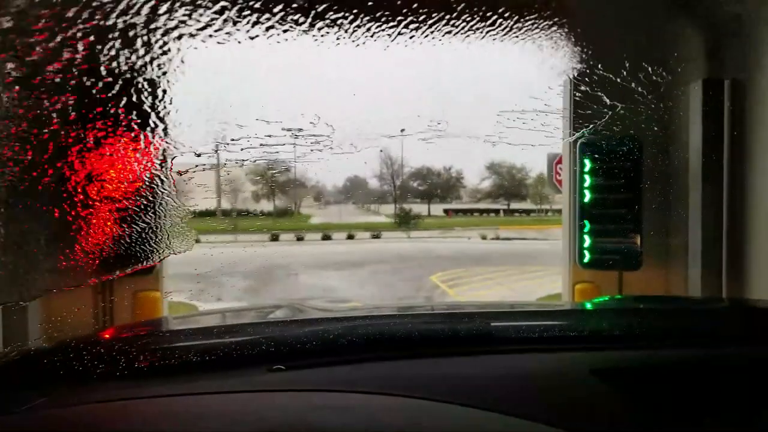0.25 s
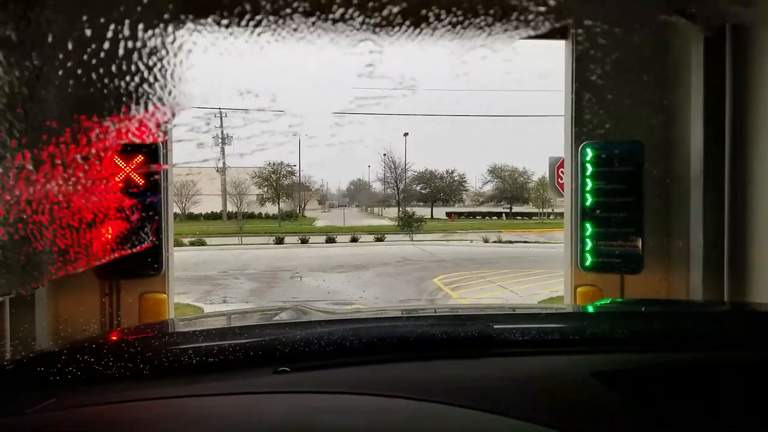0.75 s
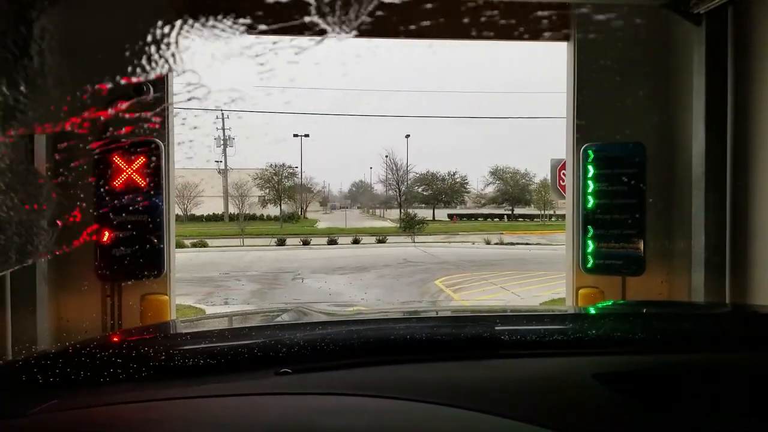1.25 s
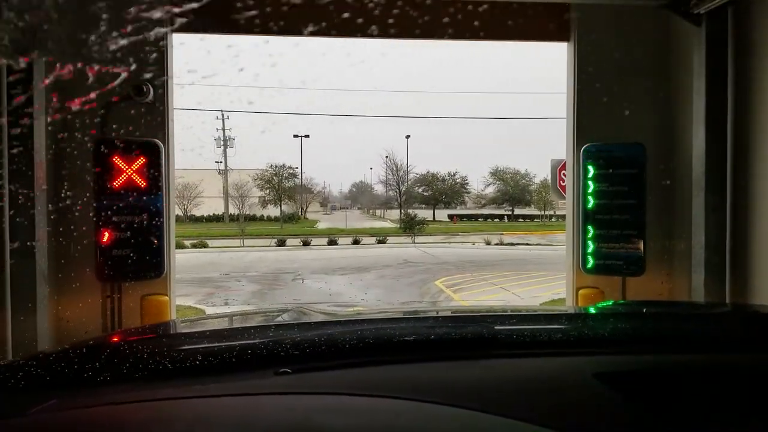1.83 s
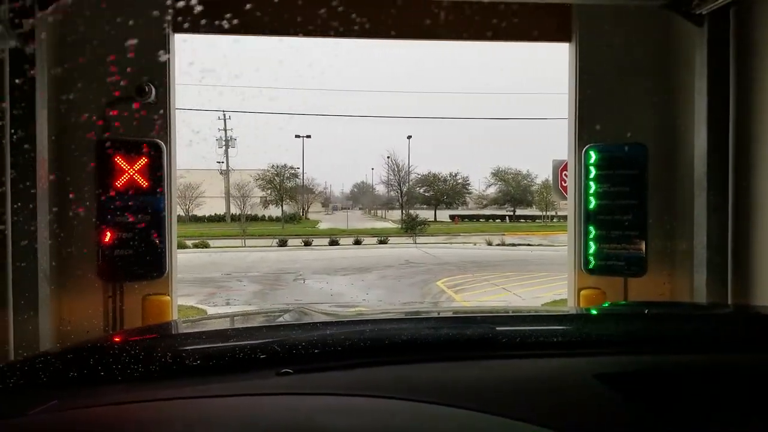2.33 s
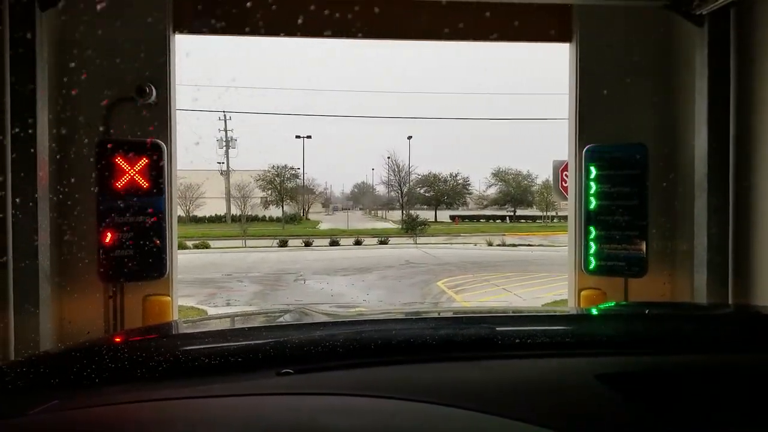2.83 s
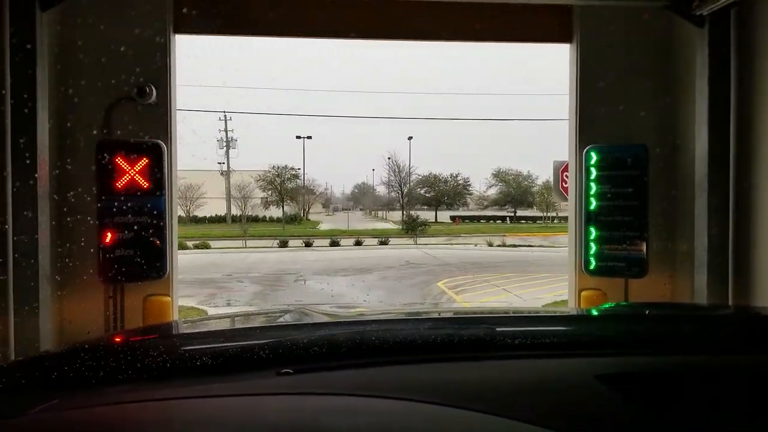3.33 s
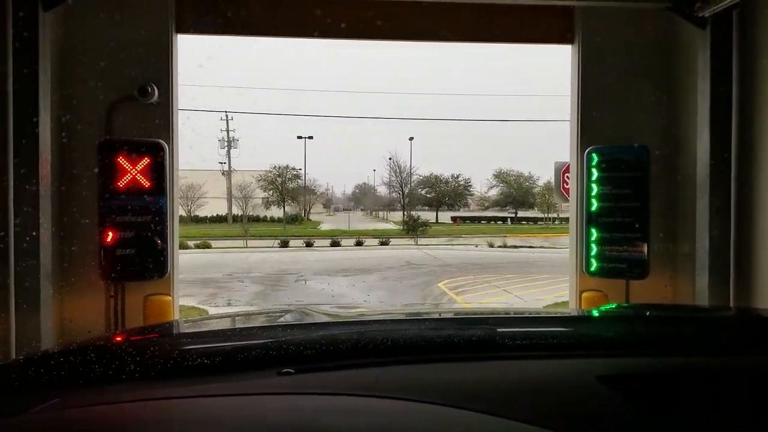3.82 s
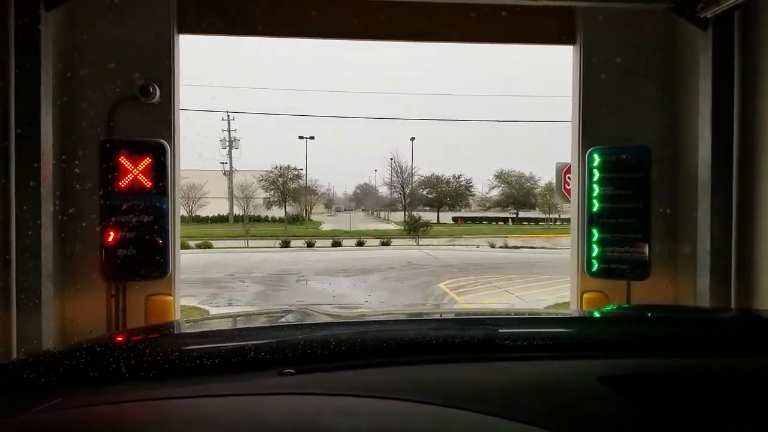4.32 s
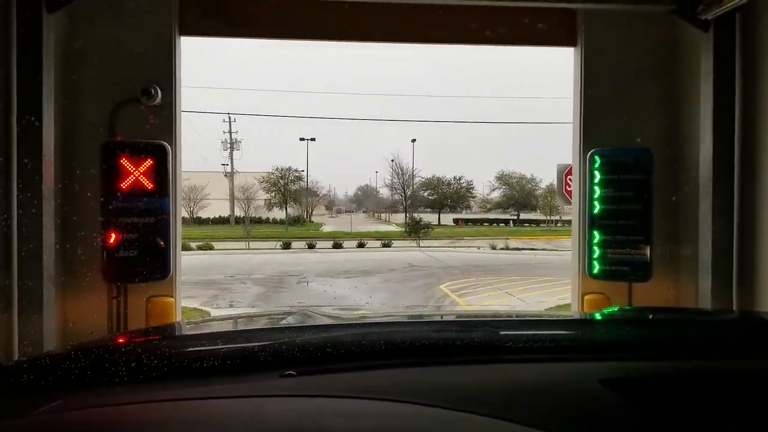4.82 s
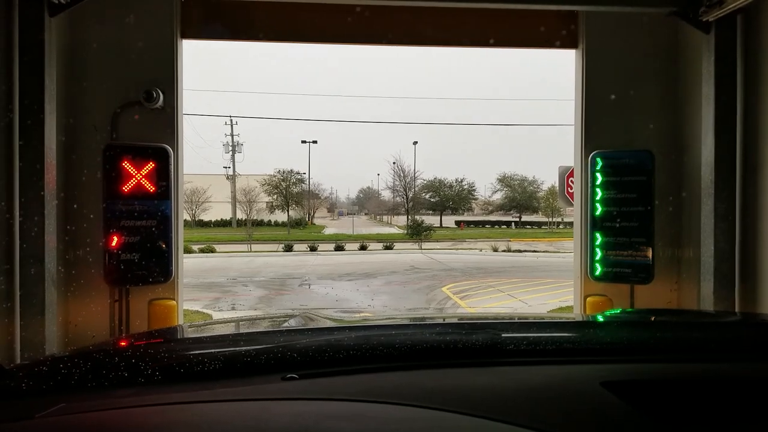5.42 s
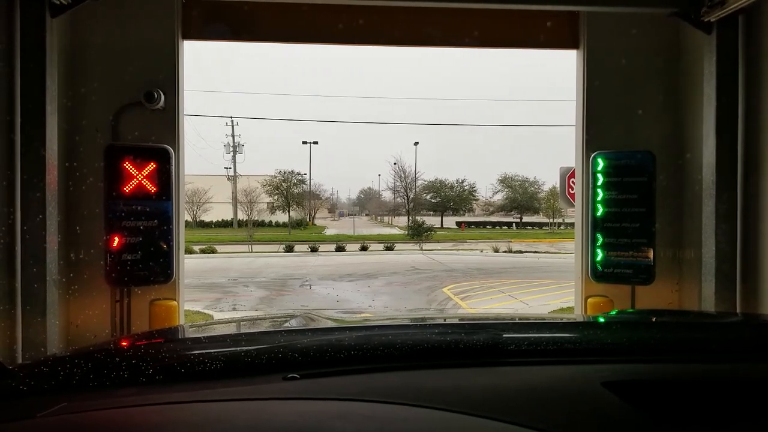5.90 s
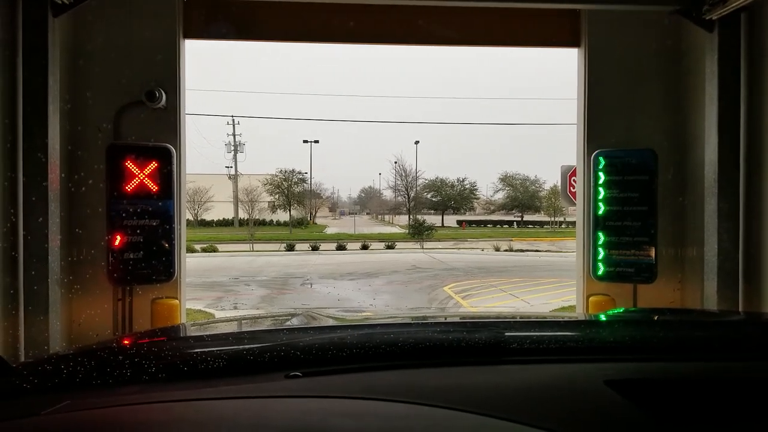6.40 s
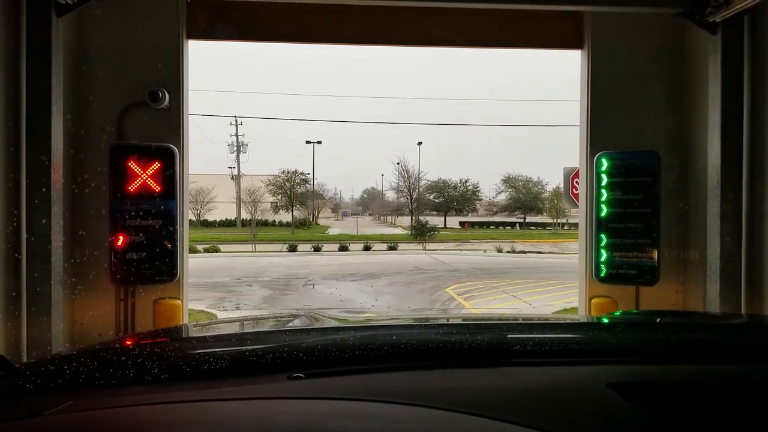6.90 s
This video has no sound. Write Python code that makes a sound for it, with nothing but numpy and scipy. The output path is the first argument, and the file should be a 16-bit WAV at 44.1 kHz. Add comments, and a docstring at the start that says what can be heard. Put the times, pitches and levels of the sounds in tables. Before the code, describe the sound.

The sound is already at full strength: a deep, gusty blower roar inside a closed car, close and wide, with muffled fan whine and airy hiss behind the panels. From 0 to 2 s, fine crisp spray peppers the windscreen, with occasional drop ticks and scattered dry wiper knocks, while irregular low booms pulse in the cabin. Around 2.1-2.6 s, jets strike squarely: panels whoosh and the wiper chatters in a quick, hard rattle. Looser knocks continue to about 4.3 s as the spray thins to almost nothing. From roughly 4.6 s the jets drum overhead; the windscreen hiss recedes, and short, faint metallic sizzles of trim flicker. Between 5.5 and 7 s, strong wavering booms around a low hum pitch dominate, the hardest making the roof lining rasp. The roar carries on to the end, finishing in a heavy boom.

```python
"""A deep, gusty roar of air and a fine patter of spray fill a closed car creeping under car-wash blowers.
Filtered noise makes the jets, fans and shaken body; random impulses over mist make the spray on the windscreen.
Decaying sines make a wiper chatter until the jets climb to the roof, while the spray thins out.
The cabin booms in noise and wavering sine notes near 120 Hz, which set loose trim and the roof lining rasping.
A look-ahead limiter holds down the biggest booms."""
import sys
import numpy as np
from scipy import signal
from scipy.fft import rfft, irfft
from scipy.io import wavfile
from scipy.ndimage import uniform_filter1d, minimum_filter1d

SR = 44100
rng = np.random.default_rng(int(sys.argv[2]) if len(sys.argv) > 2 else 0)


def master_out(mix):
    """Clip the mix to full scale and print it as 16-bit PCM to the path in sys.argv[1]."""
    frames = np.transpose(np.atleast_2d(mix))
    ceiling = np.clip(frames, -1, 1)
    pcm = np.round(ceiling * 32767).astype(np.int16)
    wavfile.write(sys.argv[1], SR, pcm)


N = 315315
T = np.arange(N) / SR  # seconds
HZ = np.maximum(np.arange(N // 2 + 1) * SR / N, 1)  # frequency of each spectrum bin


def undb(db):
    """Decibels to gain."""
    return 10 ** (np.asarray(db) / 20)


def unit(x):
    """Scale to rms 1."""
    return x / np.sqrt(np.mean(x ** 2))


def curve(points):
    """Join (seconds, value) points by straight lines."""
    return np.interp(T, *np.transpose(points))


def across(points):
    """Join (Hz, value) points on a log-frequency axis."""
    hz, value = np.transpose(points)
    return np.interp(np.log(HZ), np.log(hz), value)


def resonances(modes):
    """Gain of a set of steep-sided resonances driven by unrelated turbulence, so their powers add."""
    power = 0
    for hz, width, db in modes:
        detuning = (HZ - hz * hz / HZ) / width
        power = power + undb(2 * db) / (1 + detuning ** 2) ** 2
    return np.sqrt(power)


def shaped(x, gain):
    """Filter by a gain per frequency."""
    return irfft(rfft(x) * gain, N)


def walk(rate):
    """Random levels held 1 / rate seconds, smoothed twice; rms near 1."""
    k = int(SR / rate)
    steps = np.repeat(rng.standard_normal(N // k + 1), k)
    smooth = uniform_filter1d(uniform_filter1d(steps, k), k)
    return unit(smooth[:N])


def panned(db):
    """Left and right gains for a left-minus-right level in dB."""
    return undb(np.array([[db], [-db]]) / 2)


def strike(start, decay_s):
    """Envelope of a blow that dies away exponentially."""
    age = T[:N // 20]
    out = np.zeros(N + len(age))
    i = int(start * SR)
    out[i:i + len(age)] = np.exp(-age / decay_s)
    return out[:N]


def swell(at_s, length_s):
    """A smooth rise and fall, 1 at its peak; the length spans its 1/e points."""
    return np.exp(-np.minimum((2 * (T - at_s) / length_s) ** 2, 50))


def steadied(air, hold_s):
    """Even out the slow swells of a noise and keep its quick beating."""
    k = int(hold_s * SR)
    power = np.mean(air ** 2, axis=0)
    return air / np.sqrt(uniform_filter1d(uniform_filter1d(power, k), k // 2))


# Likeness of left and right in the cabin. Each row: frequency in Hz, correlation from -1 to 1.
STEREO_LIKENESS = [(30, .99), (112, .985), (150, .87), (200, .8), (380, .78), (700, .45), (1290, -.17),
                   (2380, .2), (4400, 0), (15000, .05)]


def turbulence(gain):
    """Stereo air noise of a given colour: long waves reach both sides alike, short ones much less."""
    alike = np.clip(across(STEREO_LIKENESS), -.99, .99)
    mid = shaped(rng.standard_normal(N), gain * np.sqrt(1 + alike))
    side = shaped(rng.standard_normal(N), gain * np.sqrt(1 - alike))
    return unit(np.array([mid + side, mid - side]))


# The jets climb from windscreen to roof. Each row: time in seconds, share on the roof from 0 to 1.
ROOF_SHARE = [(2.6, 0.08), (4.2, 0.4), (5.6, 1), (7.1, 0.84)]


def moving(front_modes, roof_modes, front_pan_db, roof_pan_db):
    """Turbulence crossfades between two sets of resonances as the jets climb."""
    share = np.clip(curve(ROOF_SHARE), 0, 1)
    front = turbulence(resonances(front_modes)) * panned(front_pan_db)
    roof = turbulence(resonances(roof_modes)) * panned(roof_pan_db)
    return np.sqrt(1 - share) * front + np.sqrt(share) * roof


def reflections(x, t60_s=0.049, wet_db=-8):
    """Windows and dashboard throw back a short, dense tail, different at each side."""
    age = T[:N // 60]
    tail = rng.standard_normal((2, len(age))) * undb(-60 * age / t60_s)
    tail *= age > .0015  # the first reflection comes after 1.5 ms
    tail /= np.sqrt(np.sum(tail ** 2, axis=1, keepdims=True))
    return x + undb(wet_db) * signal.fftconvolve(x, tail, axes=1)[:, :N]


# Colour of the fan hiss. Each row: frequency in Hz, relative density in dB per Hz.
FAN_HISS_COLOUR = [(400, 2.5), (660, 8.5), (950, -1), (1450, 4), (1900, -2), (2200, -12.5), (2350, -6),
                   (2900, -1.5), (3100, -9), (3380, -5.5), (3900, -8.5), (6000, -26.5), (9000, -32)]
# The fan whines. Each row: frequency in Hz, width in Hz, relative level in dB.
FAN_WHINES = [(696.6, 16, 3.5), (1418, 47, -11), (2400, 140, -14.5), (3390, 98, -15)]


def fans():
    """The fans in the hall, steady and muffled: coloured noise and a few faint, narrow-band whines."""
    hiss = turbulence(undb(across(FAN_HISS_COLOUR))) * undb(-43.5)
    whines = turbulence(resonances(FAN_WHINES)) * undb(-48.0)
    return hiss + whines


# Resonances of the car body. Each row: frequency in Hz, width in Hz, relative level in dB.
BODY_RESONANCES = [(32, 10, -21.5), (42.8, 8, -7), (62.4, 16, -6), (79.6, 14, -3.5)]
# How hard the jets shake the body. Each row: time in seconds, level in dB before the random swells.
BODY_SHAKE = [(0, -22), (.6, -23), (.9, -21.5), (1.1, -19.5), (1.33, -27), (1.6, -20), (2.15, -23.5),
              (2.55, -18.5), (2.7, -23), (2.95, -20), (3.25, -20), (3.6, -24.5), (4.45, -22), (5.15, -24),
              (5.5, -28.5), (6.2, -27), (7.1, -30.5)]


def buffet(swell_db=2.0, swells_per_s=8):
    """The jets shake the whole body, which answers with its lowest resonances."""
    db = curve(BODY_SHAKE) + swell_db * walk(swells_per_s)
    body = turbulence(resonances(BODY_RESONANCES))
    return steadied(body, hold_s=0.066) * undb(db) * panned(.6)


# Square hits of a jet. Each row: peak time in seconds, length in seconds, level at the peak in dB.
SQUARE_HITS = [(2.223, 0.13, -29.5), (2.43, 0.19, -25.5), (2.82, .35, -32.5), (3.19, .1, -35),
               (4.376, .07, -30.5)]
# What the panels answer with. Each row: frequency in Hz, width in Hz, relative level in dB.
WHOOSH_RESONANCES = [(415, 55, 1.5), (600, 91, -5.5), (788, 90, -8.5), (1130, 280, -17.5), (1600, 400, -23)]


def surges():
    """Now and then a jet strikes the car squarely and the panels whoosh as swelling resonant noise."""
    level = sum(undb(db) * swell(s, length) for s, length, db in SQUARE_HITS)
    return turbulence(resonances(WHOOSH_RESONANCES)) * level


# Single drops on the windscreen. Each row: start in seconds, envelope peak in dB, left minus right in dB.
WINDSCREEN_DROPS = [(.8066, -42, 6), (.9413, -41, 3.5), (1.7775, -46, 4), (2.0328, -46, 3),
                    (2.1654, -44, 0), (2.9277, -45.5, -4), (2.9911, -47, 7), (3.7618, -47, -4)]


def drops(decay_s=.003, low_hz=5500):
    """Bigger drops tick on the glass: short decaying noise with the lows rolled off below low_hz."""
    envelope = sum(strike(s, decay_s) * undb(db) * panned(pan) for s, db, pan in WINDSCREEN_DROPS)
    return shaped(envelope * rng.standard_normal((2, N)), 1 / np.sqrt(1 + (low_hz / HZ) ** 4))


# Water blown over the windscreen. Each row: time in seconds, level in dB before the ragged sheets.
WATER_LEVEL = [(0, -49.5), (.45, -52.5), (.72, -53.5), (1.0, -52), (1.7, -52), (1.9, -52), (2.18, -51),
               (2.35, -54.5), (2.95, -53.5), (3.75, -56), (4.3, -64), (7.1, -64)]
# Colour of the spray. Each row: frequency in Hz, relative gain in dB.
SPRAY_COLOUR = [(1500, -6.5), (3000, 5), (5000, 10), (7000, 1.5), (9000, -1.5), (12000, -1), (15500, -1)]


def spray(per_s=5000, scatter_db=3.5, mist_db=-4.5):
    """Countless droplets, random impulses, pepper the windscreen in ragged sheets over a fine mist of noise."""
    hits = rng.random((2, N)) < per_s / SR
    sizes = undb(scatter_db * np.minimum(rng.exponential(size=(2, N)), 5))
    signs = rng.choice([-1, 1], (2, N))
    mist = undb(mist_db) * rng.standard_normal((2, N))
    patter = unit(hits * sizes * signs) + mist
    sheets_db = 1.0 * walk(26) + .9 * walk(98)
    coloured = unit(shaped(patter, undb(across(SPRAY_COLOUR))))
    return coloured * undb(curve(WATER_LEVEL) + sheets_db) * panned(1.3)


# The blade knocks on the glass. Each row: start in seconds, peak in dB before the treble cut and pan.
WIPER_KNOCKS = [(.0149, -26), (.1124, -28), (.1341, -28), (.174, -27), (.2069, -26), (.3855, -27),
                (.616, -25), (1.1099, -29), (1.5244, -26), (2.0778, -23.5), (2.1242, -21.5), (2.1666, -20),
                (2.183, -22.5), (2.2065, -22), (2.2439, -22.5), (2.2623, -21), (2.2978, -21.5),
                (2.3117, -21.5), (2.3357, -20.5), (2.3514, -21.5), (2.3985, -26), (2.4175, -25),
                (2.5178, -21), (2.5324, -23.5), (2.5942, -25), (2.6264, -26), (2.8484, -26),
                (2.8789, -24.5), (2.8954, -26), (2.9417, -24.5), (2.9587, -24.5), (3.1397, -27),
                (3.1557, -27), (3.1694, -27), (3.1814, -25.5), (3.7522, -29), (3.8155, -29), (4.0587, -26),
                (4.072, -28.5), (4.0847, -30), (4.2617, -28), (4.2923, -30)]
# What the wiper rings with. Each row: frequency in Hz before detuning, width in Hz, relative level in dB.
WIPER_RESONANCES = [(2230, 130, 0), (2440, 140, 0), (2700, 130, 0), (2900, 160, -1), (3120, 220, -2),
                    (3500, 300, -4), (4200, 350, -12), (5200, 170, -12), (5420, 170, -12)]


def wiper(detune=0.015, soft_hz=4800, brighten_hz_per_db=170, top_hz=5900, rebound_s=0.005, rebound_db=-7,
          tremble_db=-29.5, tremble_scatter_db=1.8, count=260):
    """The blast slaps the blade on the glass: decaying sines, brighter when hard, with one rebound each.
    Scattered light taps, whose level follows the blast, make the blade tremble."""
    hz, width, db = np.transpose(WIPER_RESONANCES)[:, :, None]
    age, out = T[:N // 200], np.zeros((2, N))
    usual_db = np.mean(WIPER_KNOCKS, axis=0)[1]
    rebounds = []
    for s, peak_db in WIPER_KNOCKS:
        delay_s = rebound_s * (.5 + rng.random())
        rebounds.append((s + delay_s, peak_db + rebound_db))
    tap_s = rng.random(count) * WIPER_KNOCKS[-1][0]
    tap_db = tremble_db + np.interp(tap_s, *np.transpose(JET_BLAST))
    tap_db = tap_db + tremble_scatter_db * rng.standard_normal(count)
    for s, peak_db in WIPER_KNOCKS + rebounds + list(zip(tap_s, tap_db)):
        pitch, sign, *size = rng.standard_normal((4, len(hz), 1))
        ring = np.sin(2 * np.pi * hz * (1 + detune * pitch) * age) * np.exp(-np.pi * width * age)
        # the rubber mutes the treble, less so for hard knocks
        cutoff_hz = soft_hz + brighten_hz_per_db * (peak_db - usual_db)
        rubber = 1 / np.sqrt(1.5 + (hz / cutoff_hz) ** 8)
        share = undb(db + 1.5 * np.array(size))  # each ear catches its own share of each mode
        knock = np.sum(ring * rubber * np.sign(sign) * share, axis=1)
        i = int(s * SR)
        out[:, i:i + len(age)] += knock / np.abs(knock).max() * undb(peak_db)
    return shaped(out, 1 / np.sqrt(1 + (HZ / top_hz) ** 8)) * panned(0.9)


# What the roof lining rings with. Each row: frequency in Hz, width in Hz, relative level in dB.
LINING_RESONANCES = [(620, 230, 4.5), (1060, 400, 4), (1450, 380, -0.5)]


def lining(boom, onset_db=-5.5, rub_db=-30, full_db=-0.5):
    """Only the hardest booms make the roof lining rub and rasp, up to the end of its play."""
    swing = np.sqrt(2 * uniform_filter1d(np.mean(boom ** 2, axis=0), int(0.04 * SR)))
    play = np.clip(swing, undb(onset_db), undb(full_db)) - undb(onset_db)
    return turbulence(resonances(LINING_RESONANCES)) * play * undb(rub_db)


# Bursts of sizzle. Each row: start in seconds, length in seconds, level in dB, both before the edges are faded.
TRIM_BURSTS = [(4.648, 0.035, -54), (4.705, .045, -59), (4.785, .025, -59.5), (4.85, .04, -57),
               (4.99, .04, -57.5), (5.057, .04, -56), (5.13, .04, -55), (5.205, .02, -59.5),
               (5.375, .05, -54), (5.463, 0.041, -56), (5.633, .035, -58), (5.68, .065, -55.5),
               (5.8, .018, -62), (5.885, .022, -60), (5.978, .02, -60), (6.025, .036, -54),
               (6.17, .02, -62), (6.335, .02, -61), (6.452, .04, -58), (6.496, 0.05, -55),
               (6.712, 0.06, -61), (6.86, .02, -61), (6.923, .09, -60), (7.073, .046, -60)]
# What the trim rings with. Each row: frequency in Hz, width in Hz, level in dB before it wanders.
TRIM_RESONANCES = [(4190, 110, -3), (4305, 65, 6), (4650, 400, -5.5), (5000, 70, 0.5), (5400, 160, -8),
                   (5705, 110, -7.5), (6120, 260, -17), (6880, 260, -15), (7230, 150, -17),
                   (7900, 1300, -25)]


def trim(boom, contact_db=3.5, idle_db=-64, idle_swing_db=4, fade_s=.014, shift_db=2):
    """Loose trim touches on each swing of the boom: ringing noise in bursts, stirring faintly between them."""
    bursts = sum(undb(db) * ((T > s) & (T < s + length)) for s, length, db in TRIM_BURSTS)
    idle = curve(ROOF_SHARE) * undb(idle_db + idle_swing_db * walk(25))
    gate = uniform_filter1d(bursts, int(fade_s * SR)) + idle
    swing = boom[0] / np.abs(signal.hilbert(boom[0]))  # the boom's cycle, freed of its level
    contacts = rfft((undb(contact_db) + swing) ** 2 * rng.standard_normal((2, N)))
    ring = 0
    for mode in TRIM_RESONANCES:
        favour = undb(shift_db * walk(9))  # now one mode leads, now another
        ring = ring + irfft(contacts * resonances([mode]), N) * favour
    return steadied(ring, hold_s=.1) * gate * panned(1.1)


# How hard the jets blow on the windscreen. Each row: time in seconds, level in dB re full blast.
JET_BLAST = [(0, -4.5), (.5, -6.5), (1.4, -5), (1.95, -3), (2.2, -2), (2.4, -1.5), (2.87, -2), (3.1, -2.5),
             (3.6, -5), (3.74, -4.5), (3.95, -6), (4.3, -6), (5.6, -9.5), (6, -11), (7.1, -13)]
# How hard they drum on bonnet and roof. Each row: time in seconds, level in dB before the flutter.
PANEL_DRUMMING = [(0, -24), (1.35, -23.5), (2.2, -19.5), (4.35, -20), (4.75, -17.5), (5.3, -18),
                  (5.65, -15), (6.15, -17.5), (7.1, -20)]
# Front panels, roof and doors. Each row: frequency in Hz, width in Hz, relative level in dB.
FRONT_RESONANCES = [(170.6, 27, 2), (240, 56, -4.5), (239, 120, -4.5), (308, 43, -3.5), (351, 65, -6),
                    (401, 16, -4), (431.3, 20, -5.5)]
ROOF_RESONANCES = [(177, 50, 3), (220, 37, -0.5), (288.2, 68, 0), (328, 8.4, -6.5), (338.5, 65, -5.5),
                   (378, 88, -14)]
DOOR_RESONANCES = [(485, 140, -3), (521, 61, 0), (588, 51, -3), (611, 28, -1.5), (726, 57, -8.5),
                   (772, 29, -4)]
# Colours of the rush and of the hiss through glass. Each row: frequency in Hz, relative density in dB per Hz.
RUSH_COLOUR = [(300, -7), (480, 1.5), (670, -3), (900, -2), (1200, -5), (1550, -10), (1900, -10),
               (3000, -27.5), (6000, -45.5)]
GLASS_COLOUR = [(1200, -24), (1900, -5.5), (2150, 1), (2600, 1), (3100, -5), (4000, -9.5), (5000, -20),
                (6200, -28.5), (8000, -32.5), (11000, -46.5)]


def blowers(hiss_db=-36, rush_db=-30, doors_db=-27.5):
    """Jet noise drums on the panels, rushes past the doors, and hisses where the glass is most transparent.
    The three levels are in dB at full blast, before flutter and reflections."""
    blast = curve(JET_BLAST)
    flutter = walk(28)  # the jets flap, and panels, rush and hiss flap with them
    panels = moving(FRONT_RESONANCES, ROOF_RESONANCES, front_pan_db=-1.0, roof_pan_db=0.1)
    panels = steadied(panels, hold_s=0.27) * undb(curve(PANEL_DRUMMING) + 0.64 * flutter)
    doors = turbulence(resonances(DOOR_RESONANCES)) * panned(-.4)
    doors = doors * undb(doors_db + blast + 0.2 * walk(18))
    rush = turbulence(undb(across(RUSH_COLOUR))) * panned(-0.6)
    rush = rush * undb(rush_db + blast + 0.6 * flutter)
    glass = turbulence(undb(across(GLASS_COLOUR))) * panned(.4)
    glass = glass * undb(hiss_db + blast + 0.31 * flutter + 0.18 * walk(150))
    return panels + doors + rush + reflections(glass, wet_db=-7.0)


# Cabin air, with the jets in front and on the roof. Each row: frequency in Hz, width in Hz, relative level in dB.
CABIN_RESONANCES = [(102.3, 22, -6.5), (126, 21, -0.5), (148.7, 19, -4.5)]
ROOF_BOOM_RESONANCES = [(101, 18, 0), (117, 11, -4.5), (136, 53, -4), (163.3, 15, -2)]
# The strongest gusts. Each row: peak time in seconds, length in seconds, boom pitch in Hz before it wavers,
# peak of the note in dB before panning.
STRONG_GUSTS = [(0.555, 0.063, 123, -8), (0.747, 0.031, 126.2, -7), (0.89, 0.09, 125.9, -7.5),
                (1.004, 0.058, 124, -4.5), (1.117, 0.064, 134.2, -9), (1.716, 0.038, 121.2, -6.5),
                (2.06, 0.058, 125.1, -8), (2.366, 0.043, 131, -4.5), (2.435, 0.038, 132, -5.5),
                (2.586, 0.031, 111.7, -3), (2.945, 0.026, 113.2, -4), (3.019, 0.038, 108, -5),
                (3.116, 0.036, 112, -6), (3.311, 0.07, 132, -7.5), (3.438, 0.07, 117.2, -6),
                (3.9, 0.065, 119, -8), (4.175, .05, 128.4, -8.5), (4.294, 0.045, 118.5, -8.5),
                (4.885, 0.03, 130.6, -3.5), (5.2, 0.08, 134, -5), (5.365, .05, 121, -6),
                (5.541, 0.058, 130.1, -6), (5.767, 0.051, 118, -2.5), (5.836, 0.029, 120, -6.5),
                (5.97, 0.063, 122, -5), (6.373, 0.058, 118.8, -3.5), (6.487, 0.065, 110.2, -2),
                (6.691, 0.046, 111.4, -3.5), (6.815, 0.089, 122.8, -6), (7.1, 0.16, 114, -0.5)]
# Lulls where the boom sags. Each row: centre in seconds, length in seconds, depth in dB.
BOOM_LULLS = [(0.245, 0.043, -8), (0.71, .05, -6), (0.827, .06, -5), (1.57, 0.035, -4), (1.83, .05, -7),
              (2.531, .05, -10), (2.693, 0.074, -6.5), (3.06, .05, -9), (3.716, .05, -5.5),
              (4.038, .05, -7.5), (5.068, 0.064, -5.5), (5.319, 0.038, -7), (5.618, 0.042, -7.5)]


def cabin_boom(boom_db=-16, rise_db_per_s=0.8, gust_db=-0.14, gusts_per_s=12, lock=0.36, waver_hz=3,
               ring_pan_db=1.3):
    """Cabin air rumbles as resonant noise, growing as the car moves in; gusts lock part of it into a wavering note."""
    air = moving(CABIN_RESONANCES, ROOF_BOOM_RESONANCES, front_pan_db=1.8, roof_pan_db=.8)
    lull_db = sum(db * swell(s, length) for s, length, db in BOOM_LULLS)
    level_db = boom_db + rise_db_per_s * T + lull_db + gust_db * walk(gusts_per_s)
    air = steadied(air, hold_s=0.13) * undb(level_db)
    waver = waver_hz * np.cumsum(walk(25)) / SR  # in cycles
    notes = 0
    for s, length, hz, db in STRONG_GUSTS:
        gust = swell(s, length)
        notes = notes + undb(db) * gust * np.sin(2 * np.pi * (hz * T + waver + rng.random()))
        air = air * (1 - lock * gust)  # the noise yields to the note
    return air + notes * panned(ring_pan_db)


def scene():
    """Everything as it arrives between the front seats."""
    boom = cabin_boom()
    windscreen = reflections(spray() + drops() + wiper(), wet_db=-8.0)
    background = fans() + buffet() + surges()
    return background + windscreen + lining(boom) + trim(boom) + blowers() + boom


def record(dry):
    """A look-ahead limiter holds the biggest booms near full scale; then a steep low-pass cuts the top."""
    k = int(.006 * SR)
    headroom = 1 / np.maximum(np.abs(dry).max(axis=0), 1)
    gain = uniform_filter1d(uniform_filter1d(minimum_filter1d(headroom, 2 * k), k), k)
    low_pass = signal.ellip(10, .1, 80, 15650, fs=SR, output="sos")  # cutoff in Hz
    return signal.sosfilt(low_pass, dry * gain)


dry = scene()
out = record(dry)
master_out(out)
```